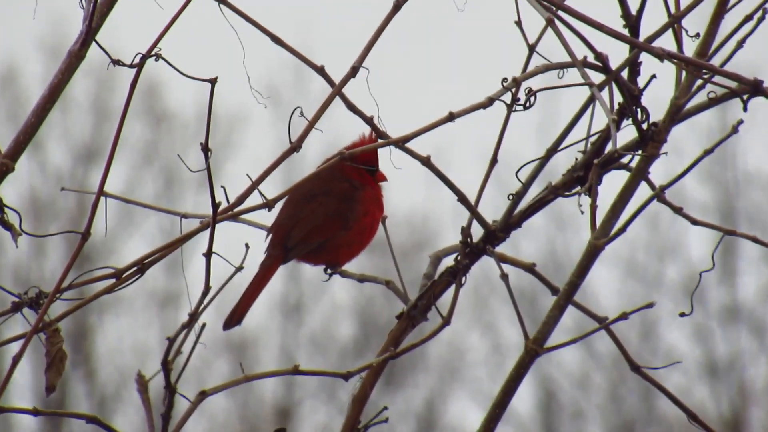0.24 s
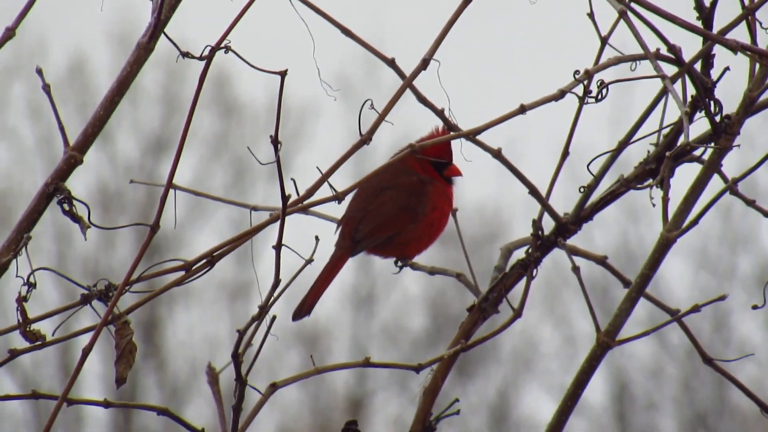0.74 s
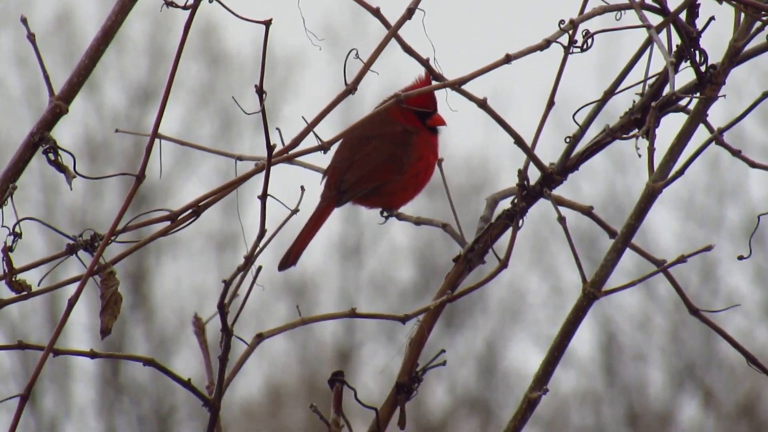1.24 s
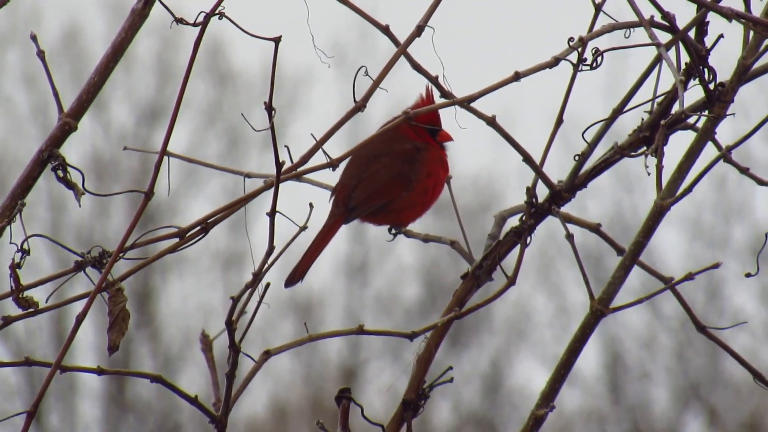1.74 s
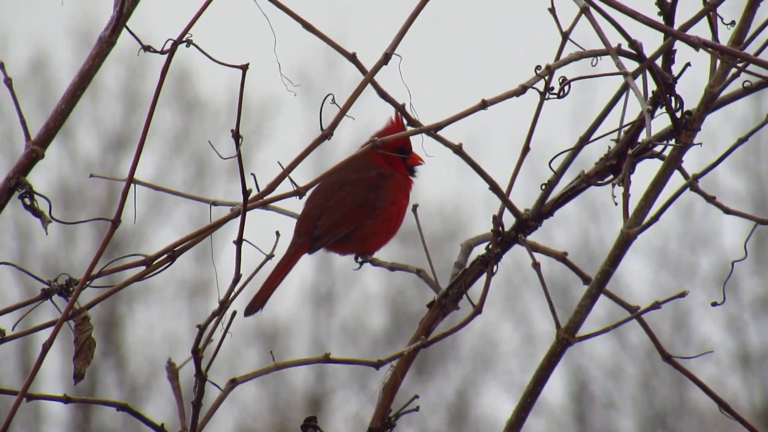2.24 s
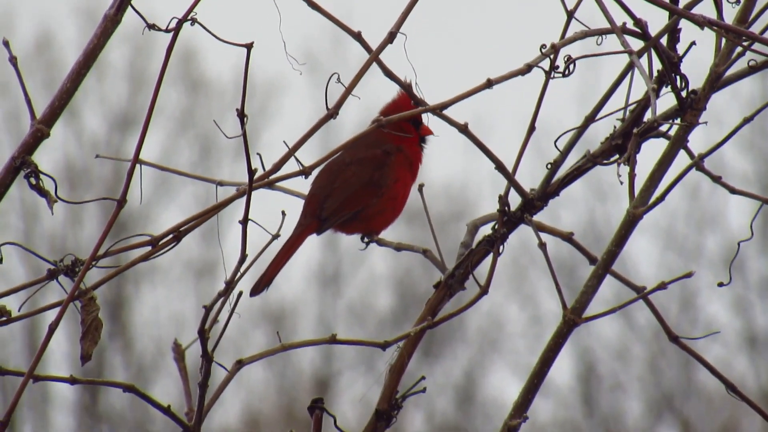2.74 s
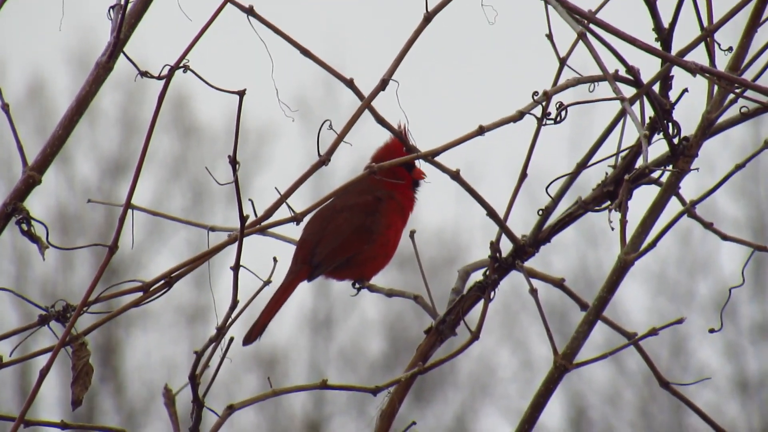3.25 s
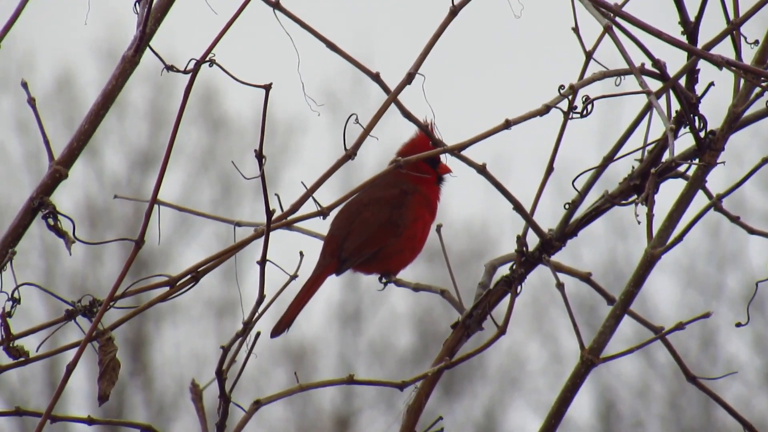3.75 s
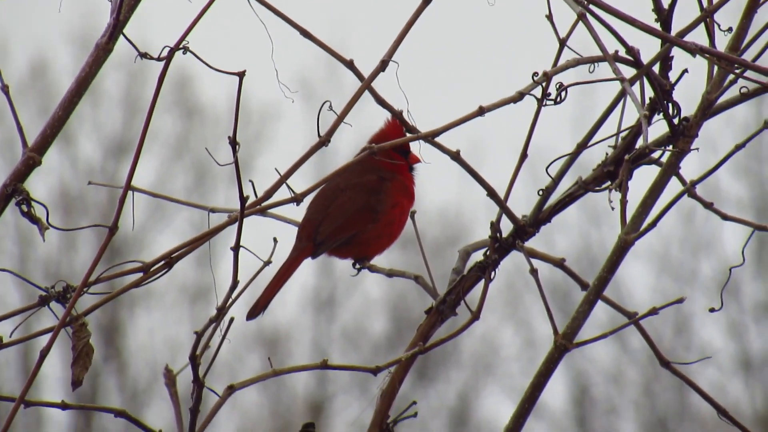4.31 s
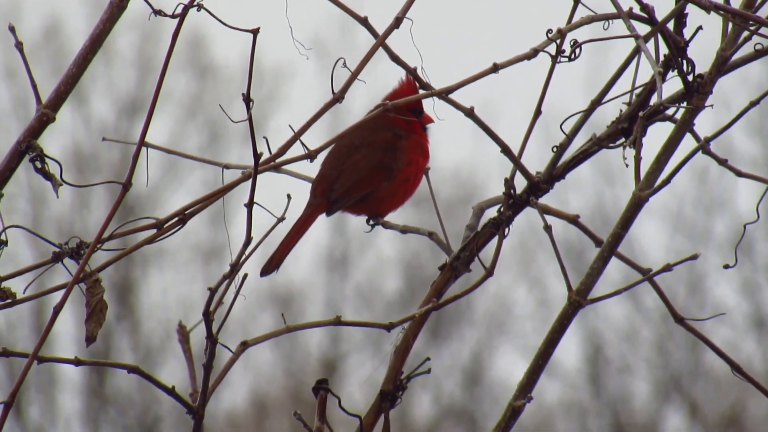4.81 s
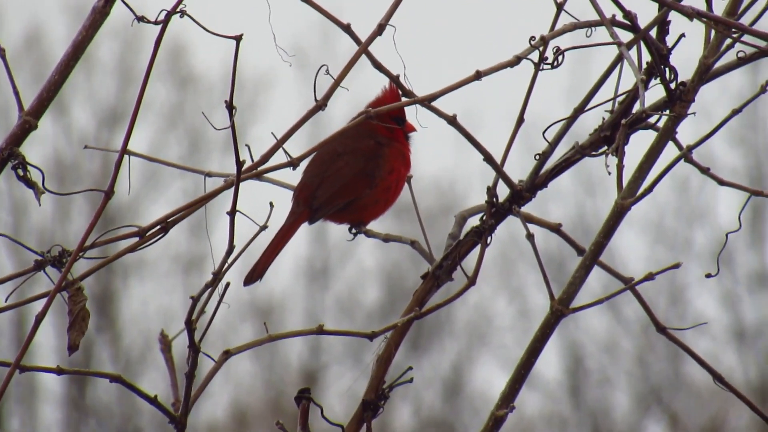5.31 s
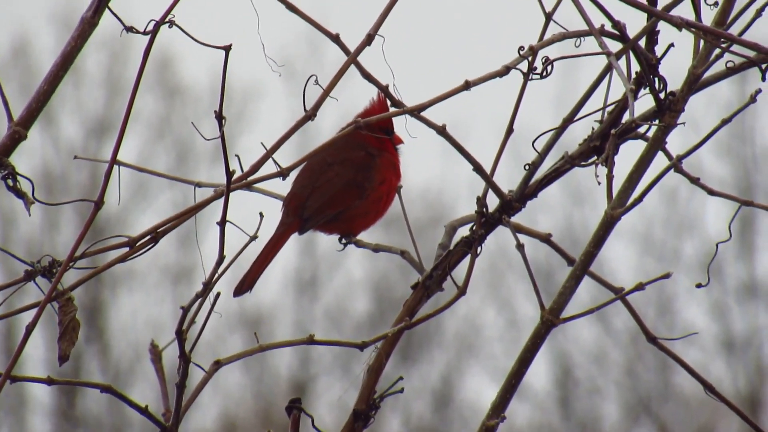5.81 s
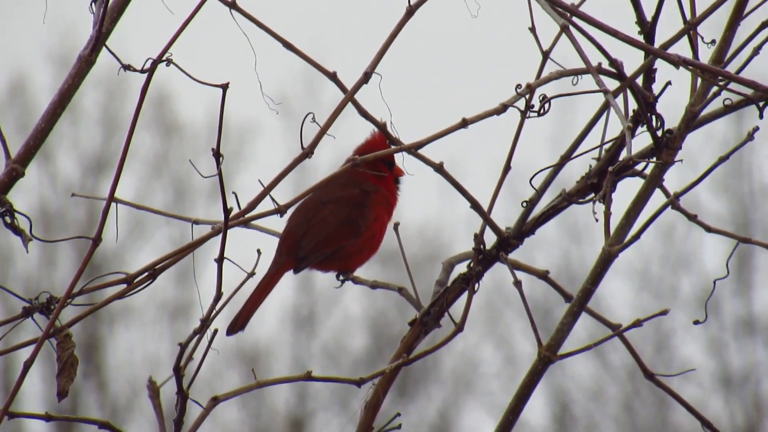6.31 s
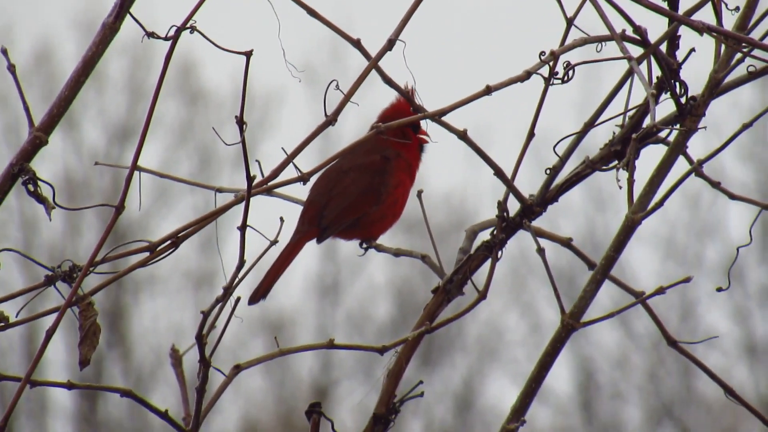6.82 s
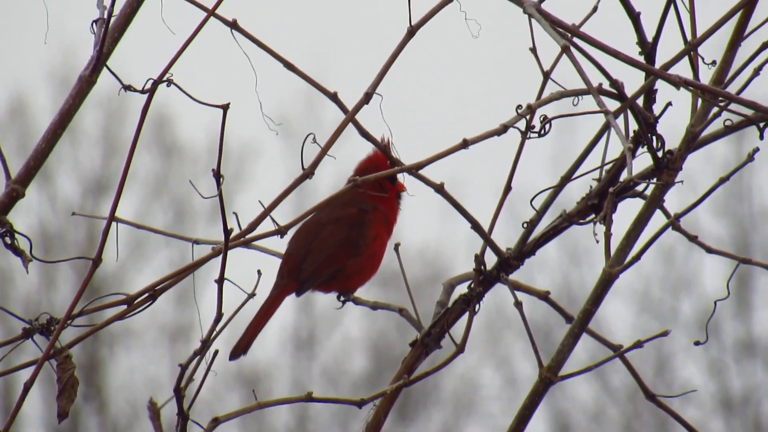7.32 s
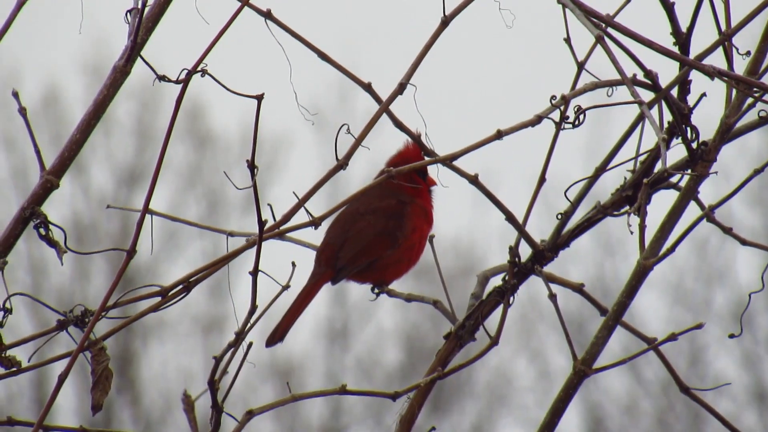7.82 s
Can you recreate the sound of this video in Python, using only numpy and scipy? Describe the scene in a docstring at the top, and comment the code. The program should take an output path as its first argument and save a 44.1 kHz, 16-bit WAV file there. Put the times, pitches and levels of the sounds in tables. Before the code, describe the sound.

Outdoors among trees, a short, faint camera whirr and a couple of ticks open over the low rumble of far traffic. Songbirds then come in with runs of upward whistles, fast trills and slow downward slides, overlapping with a woodland echo. A distant heavy vehicle swells in the middle and recedes while the singing continues. Soft handling ticks, rustles and a faint hiss sit close to the microphone.

```python
"""Songbirds in bare thickets

Birds answer one another with trills, rising whistles and long falling slurs. Each note is a nearly
pure tone from the bird's voice box, and the wood echoes it. A far road rumbles and a heavy vehicle
drones past. A camera's lens motor whirrs at the start, its body ticks and rustles in the hand,
and its microphones hiss faintly."""
import sys
import numpy as np
from scipy import signal
from scipy.fft import rfft, irfft, next_fast_len
from scipy.io import wavfile
from scipy.ndimage import uniform_filter1d

SR = 44100
rng = np.random.default_rng(int(sys.argv[2]) if len(sys.argv) > 2 else 0)


def unload_audio(sound):
    """Save the sound as a 16-bit wav file, at the path given as the first command line argument."""
    columns = np.transpose(np.atleast_2d(sound))
    # keep every value between -1 and 1, then stretch to whole-number steps
    steps = np.round(np.clip(columns, -1, 1) * 32767)
    wavfile.write(sys.argv[1], SR, steps.astype(np.int16))


N = 355401
FFT_SIZE = next_fast_len(N)
TIME, BIN_HZ = np.arange(N) / SR, np.fft.rfftfreq(FFT_SIZE, 1 / SR)


def gain(db):
    """Turn decibels into a number to multiply by."""
    return 10 ** (np.asarray(db) / 20)


def level(x, db):
    """Set a sound's average (rms) level."""
    return x * gain(db) / np.sqrt(np.mean(x ** 2))


def curve(x, points):
    """Join the points with straight lines and read the value at x."""
    return np.interp(x, *np.transpose(points))


def over_hz(points):
    """Read a curve at every frequency, spacing the octaves evenly."""
    hz, value = np.transpose(points)
    return np.interp(np.log(BIN_HZ + 1), np.log(hz), value)


def band(x, hz, width):
    """Let a sound ring around one frequency."""
    return signal.lfilter(*signal.iirpeak(hz, hz / width, fs=SR), x)


def wobble(rate, count=N):
    """A smooth random wiggle of size about 1, with `rate` new values a second."""
    hold = int(SR / rate)
    steps = np.repeat(rng.standard_normal(count // hold + 1), hold)
    return level(uniform_filter1d(uniform_filter1d(steps, hold), hold)[:count], 0)


def add(out, start_s, x):
    """Mix x into out at the given time."""
    i = int(start_s * SR)
    out[..., i:i + x.shape[-1]] += x[..., :out.shape[-1] - i]


# How alike left and right are: f/Hz, likeness/0-1
LIKENESS = [(30, 0.55), (250, 0.89), (600, 0.9), (1200, .7), (2500, 0.32)]
# How far the noise leans left: f/Hz, left minus right/dB
LEAN = [(30, 4.5), (250, 2.5), (600, 2.5), (1200, -1), (2500, 1)]
def wide_noise(colour):
    """Distant noise of a given tone colour, partly shared by left and right."""
    mid, side = (rfft(rng.standard_normal(FFT_SIZE)) * colour for _ in range(2))
    alike, sign = over_hz(LIKENESS), np.array([[1], [-1]])
    both = np.sqrt(1 + alike) * mid + sign * np.sqrt(1 - alike) * side
    both *= gain(sign * over_hz(LEAN) / 2)
    return level(irfft(both, FFT_SIZE)[:, :N], 0)


# Tone colours of the road and of the vehicle's roar: f/Hz, relative level/dB
ROAD_COLOUR = [(12, -44), (20, -18), (38, -4), (75, 3.5), (166, -5.5), (226, -8), (346, -13.5), (470, -12),
               (600, -12), (692, -27.5), (800, -15), (978, -17), (1270, -24.5), (1500, -28), (1900, -50),
               (2600, -50), (4000, -64), (5700, -120)]
ROAR_COLOUR = [(90, -45), (130, -1.5), (230, 7.5), (330, 8.5), (550, -0.5), (640, -38), (700, -16),
               (900, -10.5), (1400, -25.5), (2000, -50), (3000, -90)]
# The engine's tones: f/Hz, half-width/Hz, relative level/dB
ENGINE_TONES = [(236, 19.4, -0.5), (539, 6.8, -9.5), (590, 1.8, -18), (602.3, 7.1, -11), (917, 13, -22.5)]
# The roar swelling and fading, with chance surges in the drone: t/s, roar level/dB, drone level/dB
VEHICLE_LEVELS = [(0, -42, -45), (.45, -43, -47), (.7, -40, -50.5), (.92, -41.5, -36), (1.12, -38.5, -49),
                  (1.43, -39, -34), (1.75, -40, -38), (1.86, -40, -46), (2.02, -41, -36.5), (2.3, -33, -44),
                  (2.5, -35, -43.5), (2.85, -38.5, -40.5), (3.5, -33, -41), (4, -35, -39.5),
                  (4.42, -37, -39.5), (4.6, -38, -43.5), (5.05, -37, -43.5), (5.3, -40, -42.5),
                  (5.7, -40.5, -53.5), (6.5, -42.5, -49), (8.06, -40.5, -47.5)]
def traffic():
    """A far road rumbles steadily; a heavy vehicle adds its roar and engine drone."""
    s, roar_db, drone_db = np.transpose(VEHICLE_LEVELS)
    road = wide_noise(gain(over_hz(ROAD_COLOUR))) * gain(-40)
    roar = wide_noise(gain(over_hz(ROAR_COLOUR))) * gain(np.interp(TIME, s, roar_db))
    tones = sum(gain(db) / (1 + ((BIN_HZ - hz) / width) ** 2) for hz, width, db in ENGINE_TONES)
    drone = wide_noise(tones) * gain(np.interp(TIME, s, drone_db))
    return road + roar + drone


# The wash growing as the birds start: t/s, level/dB
WASH_SWELL = [(0, -96), (1.2, -73.5), (2.2, -64), (3.5, -65), (5, -64), (6.5, -64.5), (8.06, -65)]
# Its tone colour: f/Hz, relative level/dB
WASH_TONE = [(1000, -19), (1600, 1.5), (2600, -6.5), (3600, -11.5), (5000, -14), (8000, -16.5),
             (12000, -33)]
def wash():
    """A faint, wavering blur of noise in the birds' range."""
    return wide_noise(gain(over_hz(WASH_TONE))) * gain(curve(TIME, WASH_SWELL) + 2.3 * wobble(6))


# Where the camera's shell rings: f/Hz, width/Hz, relative level/dB
SHELL_RINGS = [(1100, 460, 3), (1435, 320, -1), (2780, 380, -7), (4700, 630, -15.5), (8650, 5700, -13),
               (12400, 5600, -11)]
# Ticks: t/s, base level/dB, brightness/dB per octave, time to fade 60 dB/s, left minus right/dB
SHELL_TICKS = [(0.332, -45.5, -5, 0.054, 1), (.36, -54, 4, 0.028, 12), (0.5942, -41, 0.6, 0.047, 10),
               (2.2476, -64, 11.5, 0.0054, 2), (2.2643, -70, 11, .005, 1.5), (2.4394, -62, 7, .007, 5),
               (2.912, -63, 8.5, .007, 0), (4.643, -64, 7, 0.0063, 0), (4.729, -41, -8, 0.016, -1),
               (6.503, -43, -3, 0.017, 3), (7.7218, -47, -2, 0.02, 8), (7.7508, -48, -1.5, .039, 5)]
def body_ticks():
    """Short bursts of noise ring the camera's plastic shell, dull or bright."""
    out, t = np.zeros((2, N)), np.arange(SR // 10) / SR
    pivot_hz = SHELL_RINGS[1][0]  # brightness leaves this ring unchanged
    for s, db, bright_db, fade_s, pan_db in SHELL_TICKS:
        noise = rng.standard_normal(len(t))
        ring = sum(level(band(band(noise, hz, width), hz, width),
                         ring_db + bright_db * np.log2(hz / pivot_hz))
                   for hz, width, ring_db in SHELL_RINGS)
        burst = ring * gain(db) * 1000 ** (-t / fade_s) * (1 - np.exp(-t / .0005))
        add(out, s, burst * gain([[pan_db / 2], [-pan_db / 2]]))
    return out


# Tone colour of a rustle: f/Hz, width/Hz, relative level/dB
RUSTLE_BANDS = [(1650, 420, 8), (2700, 2200, -7), (4600, 870, -17), (9000, 6300, -8)]
# Each rustle: middle t/s, length/s, level/dB
HAND_RUSTLES = [(6.54, 0.1, -57), (6.76, 0.14, -53.5), (7.708, 0.027, -54), (7.75, 0.053, -58)]
def rustles():
    """The camera shifts in the hand with faint, grainy swells of noise."""
    noise = rng.standard_normal((2, N))
    rub = sum(level(band(noise, hz, width), db) for hz, width, db in RUSTLE_BANDS)
    swells = sum(gain(db) * np.exp(-(2 * (TIME - s) / length) ** 2) for s, length, db in HAND_RUSTLES)
    return level(rub, 0) * gain(3.2 * wobble(200)) * swells


# Where the gears and the steps ring the housing: f/Hz, width/Hz, relative level/dB
GEAR_RINGS = [(1585, 270, 4), (2830, 880, -1), (3880, 900, -17), (6760, 2600, -3.5), (8900, 900, -1.5),
              (10800, 900, -0.5), (12100, 700, -2), (14000, 1500, -20)]
STEP_RINGS = [(2850, 500, -1), (8800, 900, -7), (12200, 970, 4)]
def lens_motor(stop_s=.435, step_hz=120.2):
    """Gear hiss and a tick at each motor step ring the housing near the left microphone."""
    t, steps = np.arange(int(stop_s * SR)) / SR, np.arange(0, stop_s, 1 / step_hz)
    size, direction = rng.standard_normal((len(steps), 2)).T
    strong_weak_db = 2.5 * (-1) ** np.arange(len(steps))
    ticks = np.zeros(len(t))
    ticks[(steps * SR).astype(int)] = gain(3.3 * size + strong_weak_db) * np.sign(direction)
    gear = rng.standard_normal((2, len(t))) * gain(2.5 * wobble(41, len(t)))
    gear[1] = .36 * gear[0] + .67 * gear[1]  # the right shares some of the left
    hiss = sum(gain(db) * band(gear, hz, width) / np.sqrt(width) for hz, width, db in GEAR_RINGS)
    ring = sum(gain(db) * band(band(ticks, hz, width), hz, width) / np.sqrt(width)
               for hz, width, db in STEP_RINGS)
    whirr = level(hiss, -56) + level(ring, -60.5)
    whirr -= band(whirr, hz=5000, width=350)  # two paths through the shell cancel here
    fade_out = np.clip((t[-1] - t) / .0045, 0, 1)
    out = np.zeros((2, N))
    add(out, 0, whirr * fade_out * gain([[3.5], [-5]]))
    return out


# Echoes off nearby trunks: delay t/s, spread/s, level against the tail/dB
TRUNK_ECHOES = [(.006, 0.0099, 11), (0.033, 0.0071, 3)]
def wood(x, fade_s, echo_db):
    """The direct sound, scatter off trunks and an echo tail that falls 60 dB in fade_s."""
    t = np.arange(int(fade_s * SR)) / SR
    mid, side = rng.standard_normal((2, len(t)))
    tail = 1000 ** (-t / fade_s) * (1 - np.exp(-t / .0044))
    trunks = sum(gain(db) * np.exp(-((t - s) / spread) ** 2) for s, spread, db in TRUNK_ECHOES)
    echo = (mid + .18 * side * np.array([[1], [-1]])) * (tail + trunks)
    response = gain(echo_db) * echo / np.sqrt(np.sum(echo ** 2) / 2)
    response[:, 0] = 1  # the direct sound
    return signal.fftconvolve(x[None], response, axes=1)[:, :N]


# A whistle's odd overtones: multiple of the pitch, relative level/dB
ODD_OVERTONES = [(3, -30), (5, -31)]
# Where the microphone's resonance lifts them: f/Hz, added level/dB
MIC_LIFT = [(8000, -25), (9500, 2.5), (12500, 2), (14500, -25)]
def whistle(hz, db, fade_s, octave_db):
    """A bird's voice box makes a nearly pure tone with overtones and soft ends."""
    phase = 2 * np.pi * np.cumsum(hz) / SR
    t = np.arange(len(hz)) / SR
    ends = np.sin(np.pi / 2 * np.clip(np.minimum(t, t[::-1]) / fade_s, 0, 1)) ** 2
    odd = sum(gain(odd_db + curve(k * hz, MIC_LIFT)) * np.sin(k * phase) * (k * hz < SR / 2)
              for k, odd_db in ODD_OVERTONES)
    return np.sqrt(2) * gain(db) * ends * (np.sin(phase) + gain(octave_db) * np.sin(2 * phase) + odd)


# Far glides and lingering echoes of the song: t/s, length/s, first, middle and last f/Hz, level/dB
FAR_GLIDES = [(2.36, .09, 4050, 3500, 3074, -68), (2.56, .09, 2230, 2050, 1890, -64),
              (2.94, .035, 4700, 4170, 3930, -73), (3.19, .22, 2680, 2140, 1780, -67),
              (3.505, .035, 4500, 4830, 5150, -73), (3.565, .02, 4170, 4110, 4050, -73),
              (5.13, .08, 3952, 3400, 2838, -67), (5.945, .04, 3500, 4200, 5030, -75),
              (5.96, .09, 2100, 2620, 2610, -64), (5.975, .265, 4400, 4250, 4100, -75),
              (6.18, .06, 3400, 2640, 1778, -63), (6.39, .42, 3590, 3550, 3480, -81)]
def far_glides():
    """Faint curved glides, roughened by the long way through the twigs."""
    out, waver_hz, flutter_db = np.zeros(N), 35 * wobble(250), 3.2 * wobble(130)
    for s, length, from_hz, middle_hz, to_hz, db in FAR_GLIDES:
        u = np.linspace(-1, 1, int(length * SR))  # 0 is the middle of the note
        hz = middle_hz + (to_hz - from_hz) / 2 * u + ((from_hz + to_hz) / 2 - middle_hz) * u ** 2
        hz += waver_hz[int(s * SR):][:len(u)]
        add(out, s, whistle(hz, db - 4 * u ** 2, fade_s=.0026, octave_db=-42))
    return out * gain(flutter_db)


# A small bird's thin "seet", by its lowest tone: t/s, f/Hz, level/dB
BUZZY_CALL = [(1.703, 9000, -70), (1.72, 8300, -63), (1.75, 7380, -57.5), (1.785, 7120, -58),
              (1.8, 7560, -63), (1.818, 7340, -56), (1.83, 7290, -62), (1.865, 7200, -73)]
def buzzy_call(buzz_hz=370):
    """A second, slow vibration stacks a ladder of unsteady tones above the pitch."""
    s, pitches, levels = np.transpose(BUZZY_CALL)
    t = np.arange(s[0], s[-1], 1 / SR)
    hz, db = np.interp(t, s, pitches), np.interp(t, s, levels)
    out = np.zeros(N)
    for k in range(5):
        rung_hz = hz + k * buzz_hz + 70 * wobble(118, len(t))
        rung_db = db - 5 * k + 4.4 * wobble(115, len(t))
        add(out, s[0], whistle(rung_hz, rung_db, fade_s=.005, octave_db=-29))
    return out


# Chips before the nearer slurs: t/s, goal f/Hz, settling time/s, level/dB, octave overtone/dB
OPENING_CHIPS = [(2.388, 3880, 0.014, -61.5, 3.5), (4.75, 4330, 0.0087, -58.5, -7),
                 (6.21, 3800, 0.013, -62.5, -5)]
# That overtone is weaker on high pitches: pitch f/Hz, added level/dB
CHIP_OCTAVE = [(4000, 2), (5200, -9), (5800, -30)]
def chips(length_s=.042, from_hz=6500, peak_s=.01):
    """Very short whistles that dive steeply and die away."""
    out, t = np.zeros(N), np.arange(int(length_s * SR)) / SR
    swell_db = np.minimum(-.5 * (1 - t / peak_s), -330 * (t - peak_s))
    for s, to_hz, settle_s, db, octave_db in OPENING_CHIPS:
        hz = to_hz + (from_hz - to_hz) * np.exp(-t / settle_s)
        add(out, s, whistle(hz, db + swell_db, fade_s=.0034, octave_db=octave_db + curve(hz, CHIP_OCTAVE)))
    return out


# Long "cheer" notes: t/s, length/s, first f/Hz, bend f/Hz, last f/Hz, level/dB
SLURS = [(2.457, .435, 3340, 2710, 1865, -54), (4.062, 0.47, 3220, 2797, 1797, -61.5),
         (4.833, 0.38, 3295, 2758, 1800, -56), (6.288, .43, 3335, 2687, 1850, -52.5)]
# How each swells: share of its length, added level/dB
SLUR_SWELL = [(0, -3.5), (.1, -4), (.65, 0), (1, -1.5)]
def slurs(bend_s=.1):
    """Whistles that drop fast to a bend, then slide steadily down."""
    out = np.zeros(N)
    for s, length, from_hz, bend_hz, to_hz, db in SLURS:
        t = np.arange(int(length * SR)) / SR
        slide = bend_hz + (to_hz - bend_hz) * (t - bend_s) / (length - bend_s)
        drop = (from_hz - slide[0]) * np.clip(1 - t / bend_s, 0, 1) ** 1.3
        swell_db = curve(t / length, SLUR_SWELL)
        add(out, s, whistle(slide + drop, db + swell_db, fade_s=.0034, octave_db=-44))
    return out


def rising(notes, shape, phrases, length_s, low_hz, fade_s):
    """Whistles that climb from low_hz along one shape, which may run on past their top."""
    out = np.zeros(N)
    u = np.arange(shape[0][0], shape[-1][0], 1 / (length_s * SR))  # share of the note's length
    scoop_db = -5 * (u < 0) * (1 - np.exp(u / .062))  # a soft lead-in
    flick_db = -20 * np.clip((u - 1) / .12 + 1, 0, 1)  # a faint tip
    for s, top_hz, db in notes:
        pace, *swell_db = [row[1:] for row in phrases if row[0] <= s][-1]
        climb = uniform_filter1d(curve(u * pace, shape), size=len(u) // 12, mode="nearest")
        hz = low_hz + (top_hz - low_hz) * climb
        note_db = db + np.interp(u, (.22, .52, .8), swell_db) + scoop_db + flick_db
        add(out, s + u[0] * length_s, whistle(hz, note_db, fade_s, octave_db=-33))
    return out


# Three kinds of rising note: t/s, top f/Hz, level/dB
TRILL_NOTES = [(3.039, 3550, -53.5), (3.109, 3690, -49.5), (3.183, 3560, -47.5), (3.255, 3557, -46),
               (3.327, 3510, -47), (3.401, 3470, -47), (3.476, 3450, -47.5), (3.55, 3470, -50),
               (3.626, 3430, -47.5), (3.702, 3340, -50.5), (5.296, 3900, -53.5), (5.369, 3740, -57),
               (5.44, 3740, -54), (5.508, 3730, -60), (5.576, 3640, -55.5), (5.647, 3540, -54),
               (5.717, 3540, -56), (5.786, 3520, -53.5), (5.856, 3400, -55.5), (5.928, 3520, -52.5),
               (5.999, 3500, -53.5), (6.07, 3466, -54), (6.146, 3210, -51), (6.872, 3500, -53.5),
               (6.939, 3640, -51), (7.013, 3490, -48), (7.087, 3460, -47.5), (7.159, 3485, -46),
               (7.234, 3480, -46.5), (7.309, 3430, -46.5), (7.385, 3390, -50), (7.46, 3400, -49.5)]
WHOIT_NOTES = [(1.768, 2820, -74), (1.912, 2870, -67), (2.066, 2850, -63), (2.209, 2880, -61.5),
               (2.364, 2950, -60), (2.514, 2880, -56), (2.67, 2860, -61), (2.831, 2900, -60.5),
               (2.983, 3015, -58.5), (3.123, 3050, -57.5), (3.257, 3000, -59), (4.368, 2820, -62),
               (4.51, 2896, -60.5), (4.659, 2920, -64), (6.253, 2960, -52.5), (6.386, 2900, -50),
               (6.517, 2896, -50), (6.647, 2950, -49.5), (6.777, 2875, -50), (6.906, 2880, -50),
               (7.038, 2950, -49), (7.164, 2930, -50)]
WHIP_NOTES = [(3.384, 3690, -55), (3.509, 3400, -54), (3.708, 3590, -61), (3.816, 3590, -59.5),
              (3.92, 3690, -58.5), (4.025, 3850, -58.5), (4.127, 3550, -61), (4.238, 3600, -61),
              (4.34, 3600, -63), (4.447, 3630, -58.5), (4.552, 3560, -60), (4.656, 3730, -57.5),
              (4.763, 3520, -61), (4.87, 3480, -60), (4.983, 3470, -59), (5.096, 3540, -60),
              (5.215, 3500, -61), (7.308, 3660, -48.5), (7.419, 4000, -49.5), (7.522, 4086, -50.5),
              (7.624, 4160, -53.5), (7.729, 4160, -52), (7.838, 4440, -55.5)]
# How each kind climbs: share of the length, share of the rise
TRILL_CLIMB = [(0, 0.056), (.14, .4), (.22, 0.66), (.31, 0.78), (.39, .92), (.67, 1), (1, 0.95)]
WHOIT_CLIMB = [(-.25, 0.04), (.05, 0.1015), (.28, 0.172), (.4, .344), (.63, .72), (.74, .875), (.82, 0.93),
               (1, 1)]
WHIP_CLIMB = [(0, 0), (.19, .05), (.33, .11), (.48, .2), (.62, .35), (.76, .58), (.9, .83), (1, 1),
              (1.16, 1.7)]
# How a phrase shapes its notes: from t/s, pace of the climb, early, middle and late added level/dB
TRILL_PHRASES = [(3, 0.95, 2, 1, -3.5), (5.2, 1.12, -6, 1, -2), (5.7, 0.98, -1.5, -1.16, 2.5),
                 (6.8, 1.09, 0.5, -.4, 0)]
WHOIT_PHRASES = [(1.4, 1.01, -3, -2.5, 6.5), (4.3, 1.25, -3.5, 5.5, 2), (6.2, 1.01, -6, 3.5, .3)]
WHIP_PHRASES = [(3.3, 1.01, -4, -5.5, 7), (4.4, 0.98, -2, -2, 4), (7.2, 1.1, -3, 1.5, -2)]
def songbirds():
    """Quick trills, slower "whoits", sharp whips and falling notes; swirling air makes them flutter."""
    trills = rising(TRILL_NOTES, TRILL_CLIMB, TRILL_PHRASES, length_s=.034, low_hz=1657, fade_s=.0055)
    whoits = rising(WHOIT_NOTES, WHOIT_CLIMB, WHOIT_PHRASES, length_s=.068, low_hz=1617, fade_s=.008)
    whips = rising(WHIP_NOTES, WHIP_CLIMB, WHIP_PHRASES, length_s=.038, low_hz=1648, fade_s=.0071)
    climbing = (trills + whoits + whips) * gain(2.2 * wobble(150))
    falling = (chips() + slurs()) * gain(1.6 * wobble(60) + 2.2 * wobble(120))
    return climbing + falling


def scene():
    """Birds in the echoing wood, the road behind them and the camera's own noises."""
    song = wood(songbirds(), fade_s=1.65, echo_db=-6.5)
    song += wood(far_glides(), fade_s=1.65, echo_db=-4)
    song += wood(buzzy_call(), fade_s=.22, echo_db=-3)
    return song + wash() + traffic() + lens_motor() + body_ticks() + rustles()


# Tone colour of the microphones' hiss: f/Hz, relative level/dB
HISS_COLOUR = [(900, -30), (1800, -4), (3300, -5.5), (5000, -7), (7000, -3), (9000, -1), (12000, -2),
               (13800, -4.5), (15100, -10.5)]
def record(dry):
    """Each microphone adds its own hiss; the highest treble is cut steeply."""
    spectrum = rfft(rng.standard_normal((2, FFT_SIZE))) * gain(over_hz(HISS_COLOUR))
    hiss = level(irfft(spectrum, FFT_SIZE)[:, :N], -67)
    treble_cut = signal.ellip(14, .3, 70, 15150, fs=SR, output="sos")
    return signal.sosfilt(treble_cut, dry + hiss)


dry = scene()
out = record(dry)
unload_audio(out)
```